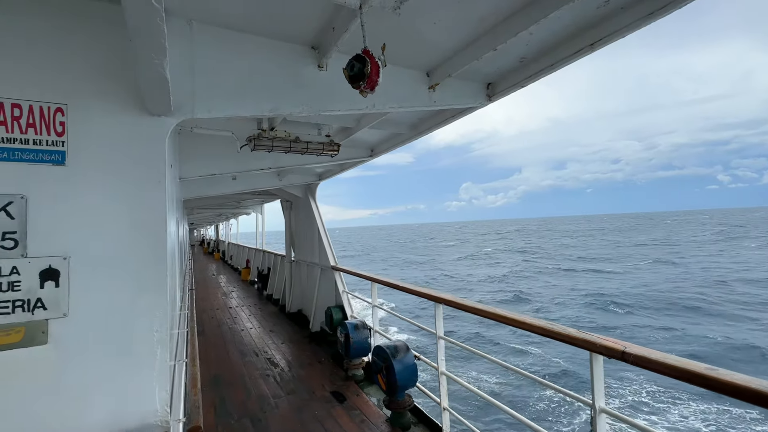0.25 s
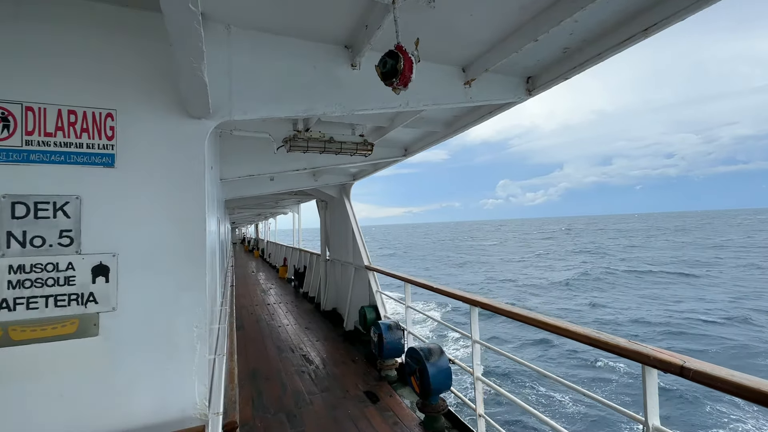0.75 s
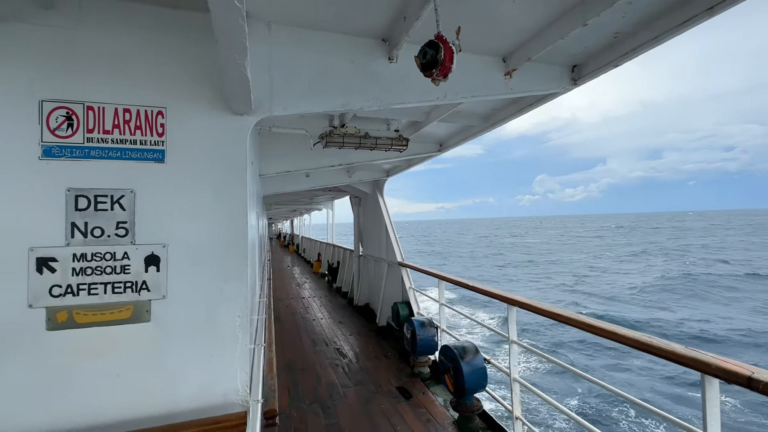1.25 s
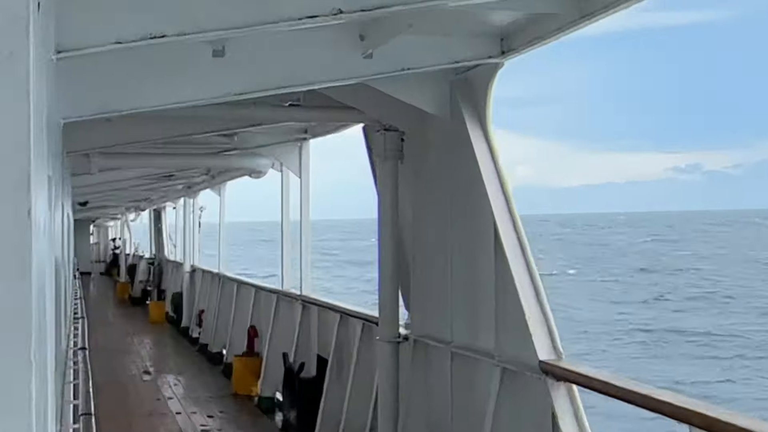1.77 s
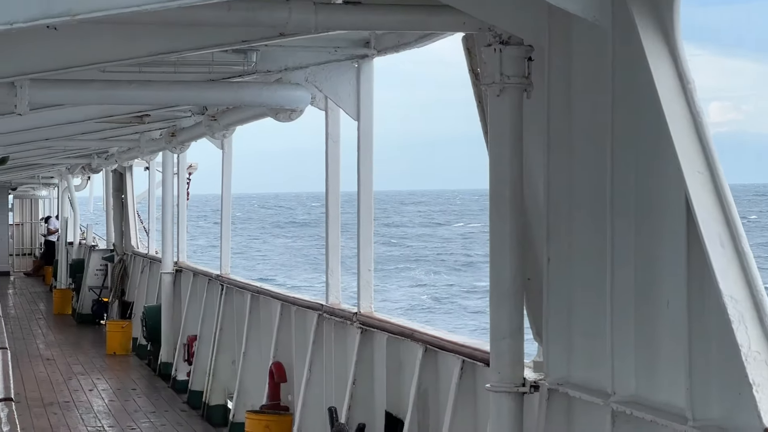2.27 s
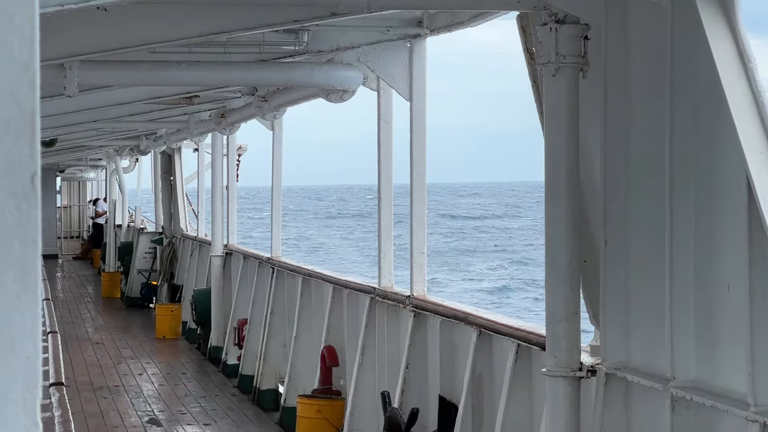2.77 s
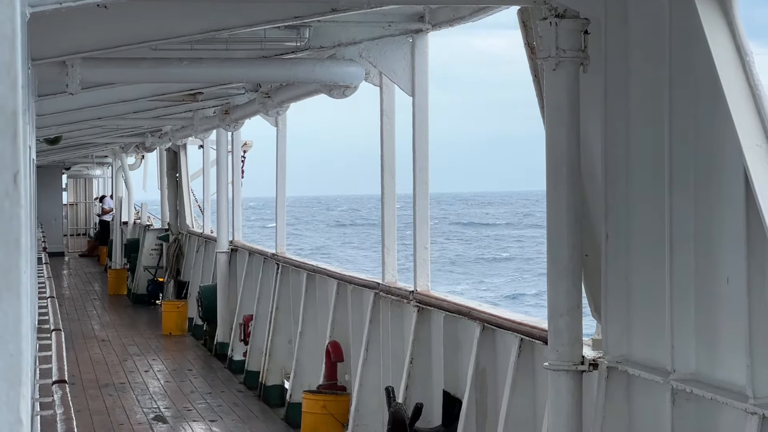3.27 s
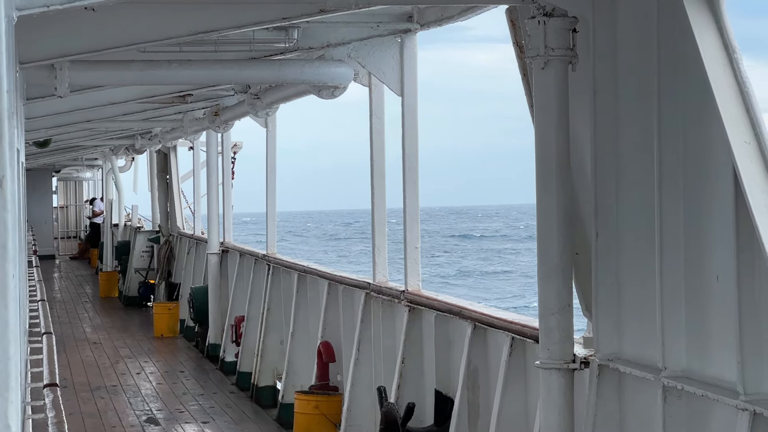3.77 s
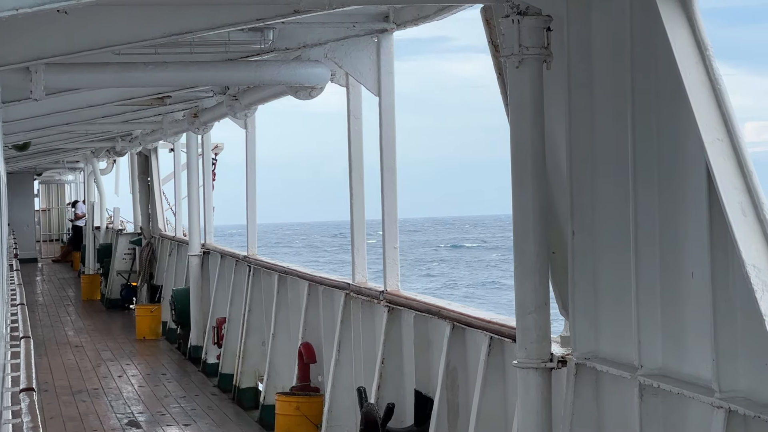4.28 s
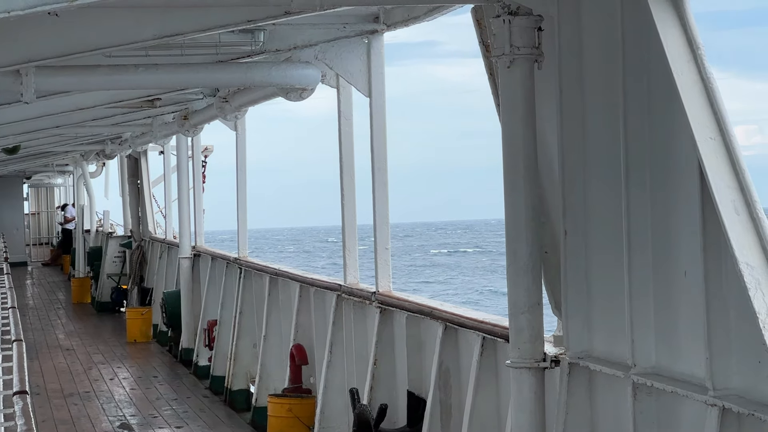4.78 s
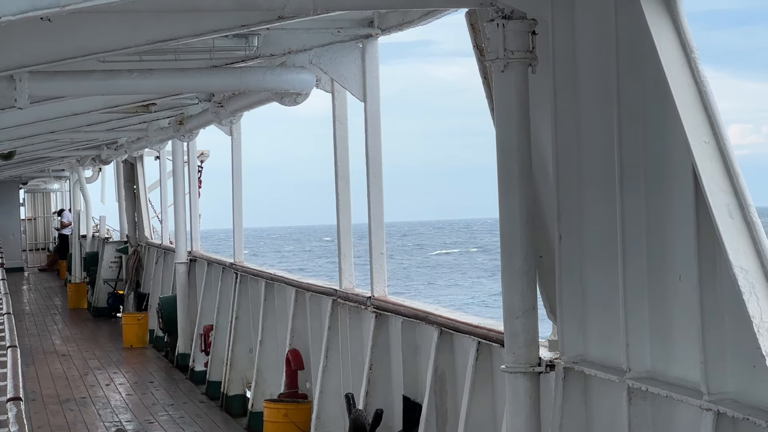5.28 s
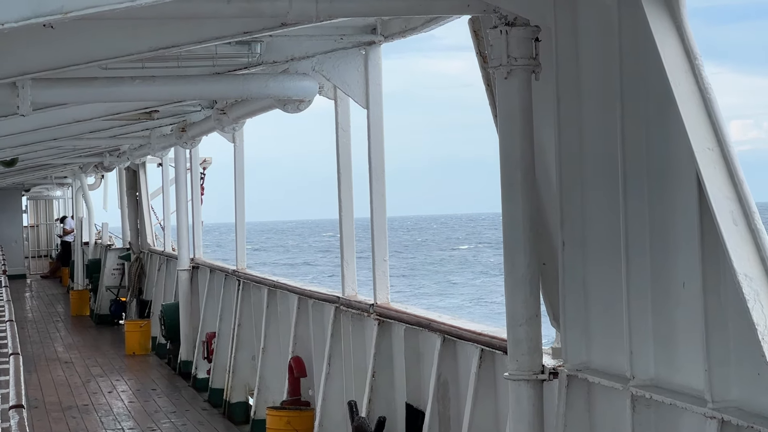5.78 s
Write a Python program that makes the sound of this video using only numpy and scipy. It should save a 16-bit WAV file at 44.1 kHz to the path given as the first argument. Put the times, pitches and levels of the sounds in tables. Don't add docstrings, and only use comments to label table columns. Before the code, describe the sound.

Open side deck of a ship at sea, phone microphone near the rail. A loud low engine throb and generator hum blend with rumbling wind and the constant wash and fizz of the bow wave. Soft thuds of wind hit the microphone. Before two seconds the wide airy sound switches abruptly to a narrower, softer-hissing one, then gusts grow and a tiny dry tick passes.

```python
import sys
import numpy as np
from scipy import signal
from scipy.fft import rfft, irfft, next_fast_len
from scipy.io import wavfile
from scipy.ndimage import uniform_filter1d

SR = 44100
rng = np.random.default_rng(int(sys.argv[2]) if len(sys.argv) > 2 else 0)


def elevation(decibels):
    levels = np.asarray(decibels, float)
    return 10 ** (levels / 20)


def pcm_store(signal):
    levels = np.round(np.clip(np.atleast_2d(signal), -1, 1) * 32767)
    wavfile.write(sys.argv[1], SR, levels.astype(np.int16).T)


N = 266187

CUT_S, FADE_S = 1.722, 0.011

# (order [turns], level against the throb [dB])
ENGINE_ORDERS = [(5, -17), (6, 1.5), (7, -8), (8, -12), (10, -19.5), (12, -32.5), (13, -16), (15, -19),
                 (17, -25), (18, -16), (19, -18.5)]
# (time [s], throb level [dB])
ENGINE_LOAD = [(0, -20), (1, -22), (2.1, -18), (3, -16.5), (4.1, -17.5), (4.95, -18.5), (5.3, -17.5),
               (6.04, -13)]
# (frequency [Hz], level [dB rms])
PLANT_HUM = [(37.8, -32.5), (41.2, -29.5), (44.8, -25), (79, -27.5), (130.7, -33), (248.6, -43.5),
             (331.5, -41), (662, -58), (856, -47.5)]
ENGINE_HZ = 8.43
BEAT_HZ, BEAT_TOP_S, BEAT_SHARE = 1.2, 2.916, 0.17
WIDE_LAG_S, WIDE_PAN_DB = 0.00034, 0.6

# (time [s], level [dB])
BOW_WAVE = [
    [(0, -31.5), (.7, -32), (1, -30), (1.47, -30), (1.71, -30.5)],
    [(1.74, -36), (2.25, -35.5), (2.9, -34.5), (3.7, -33), (4, -33.5), (4.35, -33), (4.9, -34.5),
     (5.5, -33), (6.04, -35)],
]
# (frequency [Hz], left [dB per Hz], right [dB per Hz])
SEA_COLOUR_WIDE = [(230, -52, -52), (614, -58.5, -63), (790, -53, -56.5), (1250, -55.5, -58),
                   (1800, -61, -62), (2330, -64.5, -64.5), (3800, -68, -70), (6400, -64, -72),
                   (8940, -69, -69), (10300, -81.5, -73), (10900, -80.5, -86), (12000, -86, -75),
                   (13000, -84, -87), (15250, -86.9, -85)]
# (frequency [Hz], left [dB per Hz], right [dB per Hz])
SEA_COLOUR_BEAM = [(245, -53.5, -52.5), (580, -63, -68), (810, -57, -61), (1200, -61.5, -59),
                   (1820, -63.5, -55.5), (2330, -70, -69.5), (4120, -74, -74), (6870, -68, -68),
                   (8600, -71.5, -71), (10300, -75, -75.5), (11800, -72.5, -68), (11600, -77, -89),
                   (13000, -81.9, -81), (15800, -84.5, -84)]
SPRAY_SHARE = 0.85

# (time [s], level [dB])
WIND_STRENGTH = [(0, -20), (.5, -22), (1.05, -18.5), (1.8, -21), (2.3, -19.5), (2.6, -17.5), (2.95, -19.5),
                 (3.25, -15), (3.7, -16), (4, -17.5), (4.4, -16.5), (4.85, -16), (5.1, -16), (5.6, -19),
                 (5.87, -16.5), (6.04, -22.5)]
# (frequency [Hz], level [dB per Hz])
WIND_COLOUR = [(20, -48), (30, -61), (38, -37.5), (58, -41), (75, -36), (105, -39), (135, -42.5),
               (170, -48.5), (230, -52.5), (290, -61), (350, -57.5), (500, -59), (800, -64)]
ROAR_SHARE, ROAR_WANDER_DB = 0.88, 1.4

# (frequency [Hz], left-right likeness [0-1], left leads by [rad])
WIDE_PORTS = [(0, 1, 0), (200, .92, .08), (500, .45, .8), (900, .2, 1), (1300, .3, 1.4), (1900, .25, 3),
              (3000, .1, 4), (9700, .2, 4), (10500, .93, 3.14), (12200, .98, 3.14), (12900, .3, 1.5),
              (13700, .55, .3), (14100, .99, 0)]
# (frequency [Hz], left-right likeness [0-1], left leads by [rad])
BEAM_PORTS = [(0, .998, 0), (220, .95, .1), (700, .6, .6), (1200, .42, 1.2), (1700, .3, 3.1),
              (2100, .62, 6.3), (2350, .68, 6.8), (5000, .95, 6.35), (6800, .83, 6.95), (7450, .995, 9.42),
              (8300, .89, 12.4), (11150, .96, 9.42), (12200, .95, 9.35), (12700, .5, 8), (14300, .92, 6.3)]

# (time [s], peak level [dB], length [s])
STRONG_EDDIES = [(0.034, -25, 0.021), (0.142, -19, .078), (0.794, -25, 0.067), (1.151, -33, 0.034),
                 (1.308, -31, .052), (1.722, -26.6, .049), (2.987, -25, 0.034), (3.114, -25.4, .05),
                 (3.312, -21, .067), (3.426, -20, 0.013), (3.541, -22, .053), (3.88, -20, .052),
                 (4.104, -24, 0.068), (4.194, -17, 0.081), (4.3, -24, .026), (4.521, -23, 0.067),
                 (4.888, -24.5, 0.031), (4.952, -20, .027), (5.005, -21, .079), (5.258, -24.8, 0.044)]
# (start [s], end [s])
SQUALL_SPANS = [
    (0.299, 1.7),
    (2.6, 4.85),
]
PATTER_DB, SHORTEST_PATTER_S, LONGEST_PATTER_S = -29, 0.02, 0.0694
PUFF_HZ, PUFF_HZ_PER_DB = 100, -2.5

TICK_S = 3.73085
TICK_STEPS = (.12, .8, .12)


def walk(rate, size):
    hold = int(1000 / rate)
    count = int(size / SR * rate * 1.2) + 3
    steps = np.repeat(rng.standard_normal(count), hold)
    slewed = uniform_filter1d(uniform_filter1d(steps, hold), hold)
    return 1.3 * np.interp(np.arange(size) * 1000 / SR, np.arange(len(steps)), slewed)


def curve(table, points):
    at, *columns = np.transpose(table)
    return [np.interp(points, at, column) for column in columns]


def swing(db):
    return db - 10 * np.log10(np.mean(elevation(db) ** 2))


def field(colour, ports, size, swell_db, low_db, high_db, flicker_db, rate):
    fast = next_fast_len(size)
    hz = np.arange(fast // 2 + 1) * SR / fast + 1e-3
    points, *sides_db = np.transpose(colour)
    levels_db = [np.interp(np.log(hz), np.log(points), side, low_db, high_db) for side in sides_db]
    gain = elevation(np.array(levels_db))

    like, lead = curve(ports, hz)
    like = np.clip(like, 0, 1)
    shared, apart = rfft(rng.standard_normal((2, fast))) * np.sqrt(SR / 2)
    sign = np.array([[1], [-1]])
    mixed = np.sqrt((1 + like) / 2) * shared + sign * np.sqrt((1 - like) / 2) * apart
    pair = gain * np.exp(0.5j * sign * lead) * mixed

    out = np.zeros((2, size))
    for octave in range(int(np.log2(points[0])), int(np.log2(points[-1])) + 2):
        band = np.clip(1 - abs(np.log2(hz) - octave), 0, 1)
        level_db = swell_db(2.0 ** octave) + flicker_db * walk(rate, size)
        out += irfft(pair * band, fast)[:, :size] * elevation(level_db)
    return out


def machinery(t):
    speed_hz = ENGINE_HZ * (1 + 0.00203 * walk(0.672, N))
    turn = 2 * np.pi * np.cumsum(speed_hz) / SR
    beat = 1 + BEAT_SHARE * np.cos(2 * np.pi * BEAT_HZ * (t - BEAT_TOP_S))
    throb = elevation(curve(ENGINE_LOAD, t)[0]) * beat

    orders = np.zeros(N)
    for order, db in ENGINE_ORDERS:
        waver_db = 2.4 * walk(3.12, N) * (order != 6)
        orders += elevation(db + waver_db) * np.sin(order * turn + rng.uniform(0, 2 * np.pi))

    plant = np.zeros(N)
    for hz, db in PLANT_HUM:
        level = elevation(db + 2.0 * walk(4.03, N))
        phase_waver = (0.5 + hz / 400) * walk(8, N)
        plant += level * np.sin(2 * np.pi * hz * t + phase_waver)

    hum = np.sqrt(2) * (throb * orders + plant)
    wide = np.clip((CUT_S - t) / FADE_S + 0.5, 0, 1)
    late = np.interp(t - WIDE_LAG_S * wide, t, hum)
    return np.array([hum * elevation(0.2 + WIDE_PAN_DB * wide), late * elevation(0.14)])


def sea(t, colour, ports, wake):
    wash_db = swing(curve(wake, t)[0])
    spray_db = swing(SPRAY_SHARE * wash_db)

    def swell_db(hz):
        return wash_db if hz < 2500 else spray_db

    with_floor = [(120, -99, -96)] + list(colour)
    return field(with_floor, ports, len(t), swell_db, low_db=-100, high_db=-120, flicker_db=0.5, rate=10)


def wind(t, ports):
    buffet_db = curve(WIND_STRENGTH, t)[0] - np.mean(np.transpose(WIND_STRENGTH)[1])
    roar_db = ROAR_SHARE * buffet_db + ROAR_WANDER_DB * walk(4.94, len(t))

    def swell_db(hz):
        return buffet_db if hz < 130 else roar_db

    return field(WIND_COLOUR, ports, len(t), swell_db, low_db=-74, high_db=-100, flicker_db=1.5, rate=12)


def eddies(count=12):
    slot = np.arange(count)
    rows = [STRONG_EDDIES]
    for start, end in SQUALL_SPANS:
        when, size, long = rng.random((3, count))
        times = start + (end - start) * (slot + when) / count
        peaks_db = PATTER_DB + 1.2 * (2 * size - 1)
        lengths = SHORTEST_PATTER_S + (LONGEST_PATTER_S - SHORTEST_PATTER_S) * long ** 2
        rows.append(np.array([times, peaks_db, lengths]).T)
    return np.vstack(rows)


def puffs(t):
    out = np.zeros((2, N))
    reach = int(0.2 * SR)
    since = np.arange(reach) / SR
    for time, db, length in eddies():
        hz = PUFF_HZ + PUFF_HZ_PER_DB * (db - PATTER_DB)
        band = signal.butter(2, [0.58 * hz, 1.68 * hz], "band", fs=SR, output="sos")
        churn = rng.standard_normal((2, 2 * reach))
        pull, push = signal.sosfilt(band, churn)[:, reach:]
        shape = (since / length) * np.exp(-(since / (0.65 * length)) ** 2)
        strength = np.sum(shape ** 2 * pull ** 2) * shape.max() ** 2 / np.sum(shape ** 2)
        size = elevation(db) * 0.66 * shape / np.sqrt(strength)
        start = max(int((time - 0.5 * length) * SR), 0)
        out[:, start:start + reach] += size * np.array([0.69 * push + pull, 0.68 * push - pull])
    return out


def scene():
    t = np.arange(N) / SR
    beam = np.clip((t - CUT_S) / FADE_S + 0.5, 0, 1)
    end, start = int(1.8 * SR), int(1.6 * SR)
    first, last = t[:end], t[start:]
    out = machinery(t) + puffs(t)
    wide_air = sea(first, SEA_COLOUR_WIDE, WIDE_PORTS, BOW_WAVE[0]) + wind(first, WIDE_PORTS)
    beam_air = sea(last, SEA_COLOUR_BEAM, BEAM_PORTS, BOW_WAVE[1]) + wind(last, BEAM_PORTS)
    out[:, :end] += np.sqrt(1 - beam[:end]) * wide_air
    out[:, start:] += np.sqrt(beam[start:]) * beam_air
    return out


def band_limit(x):
    return signal.sosfilt(signal.butter(12, 15990, fs=SR, output="sos"), x)


def record(dry):
    soft = np.tanh(0.6 * dry) / 0.6
    at = int(TICK_S * SR)
    soft[:, at - 1:at + 2] -= TICK_STEPS
    top = signal.ellip(10, 0.2, 70, 15750, fs=SR, output="sos")
    return band_limit(signal.sosfiltfilt(top, soft))


dry = scene()
out = record(dry)
pcm_store(out)
```